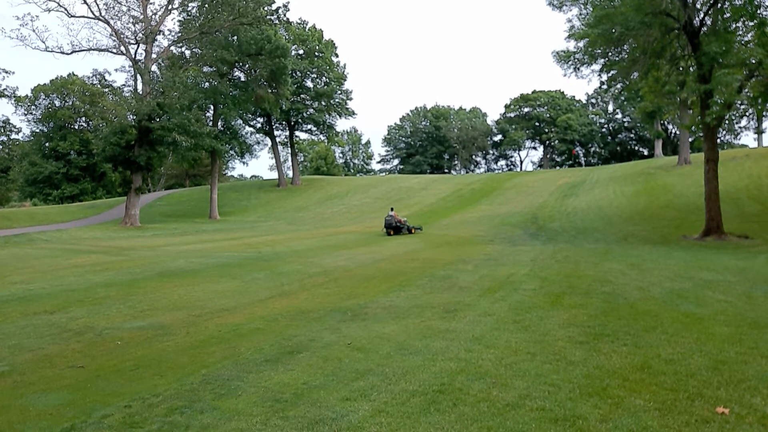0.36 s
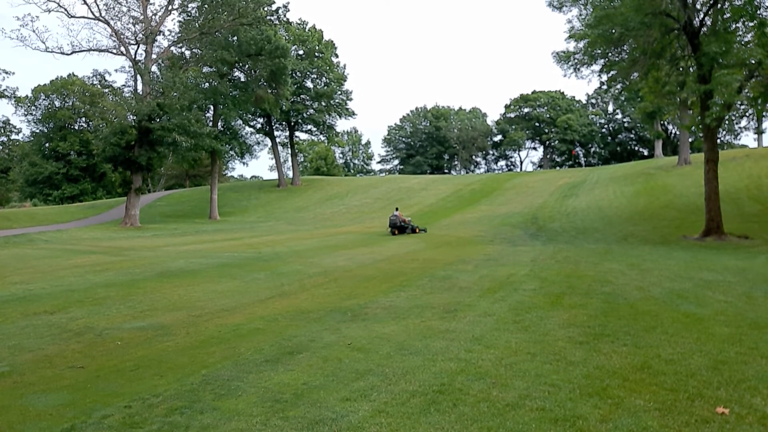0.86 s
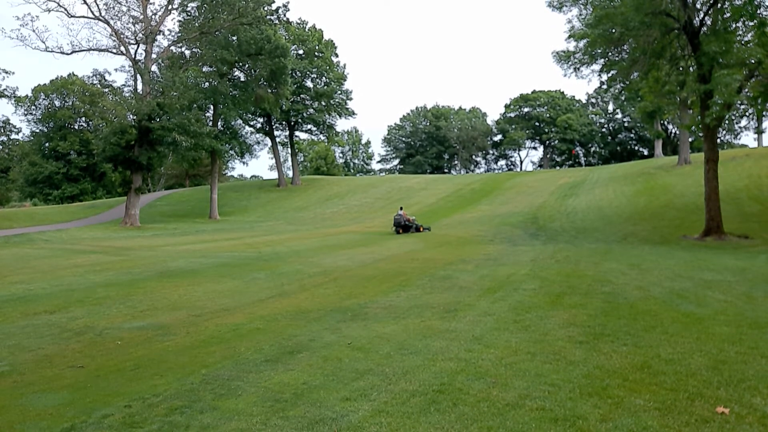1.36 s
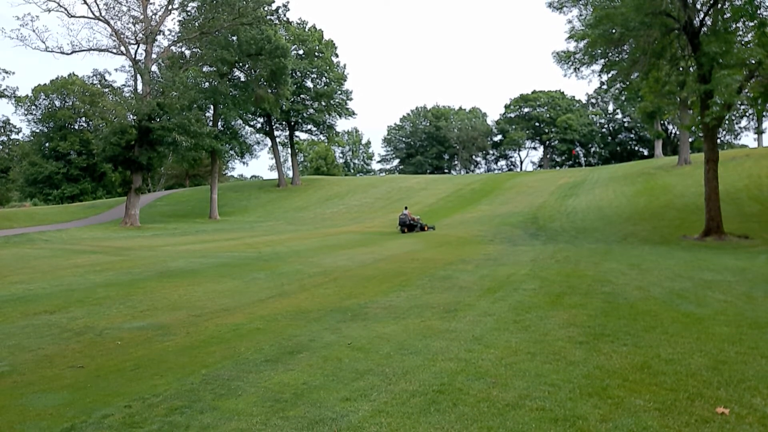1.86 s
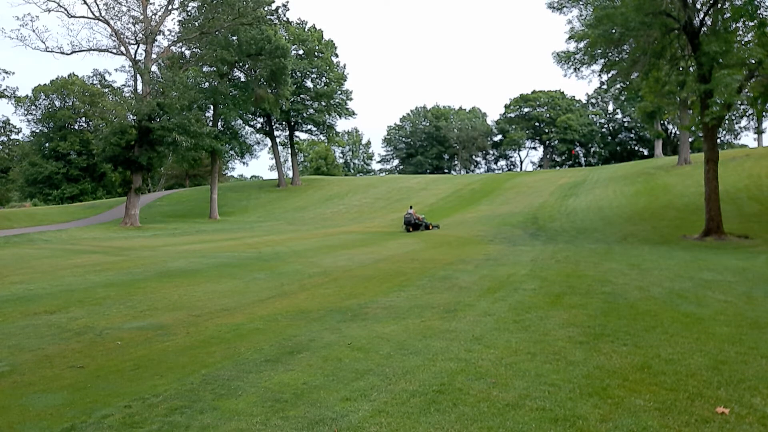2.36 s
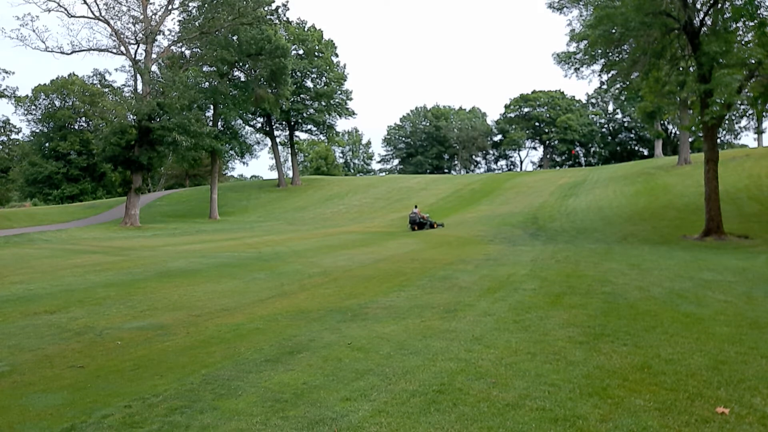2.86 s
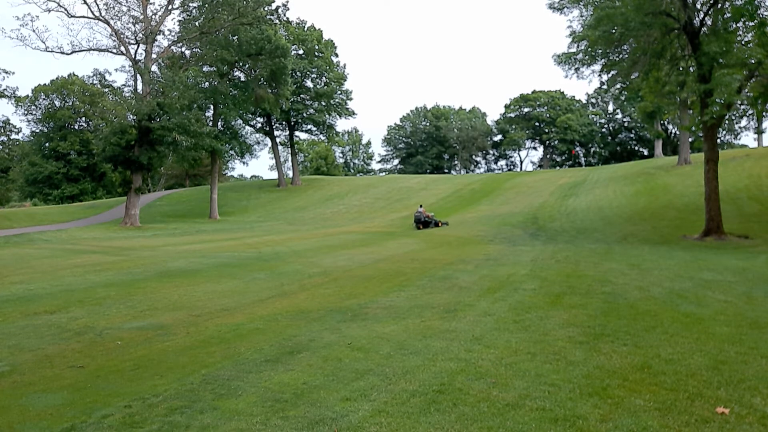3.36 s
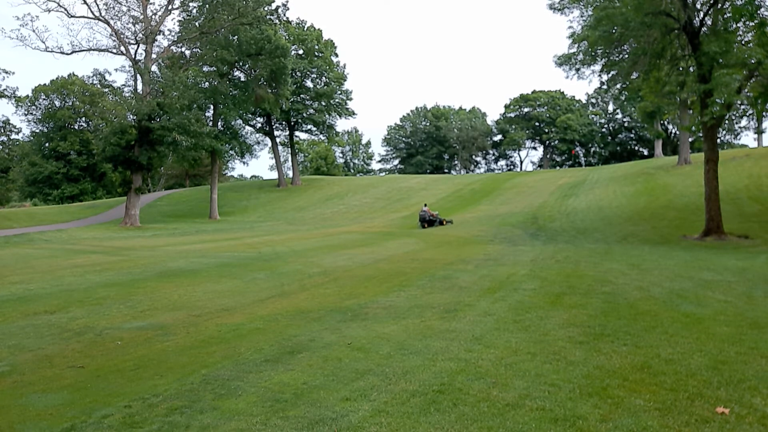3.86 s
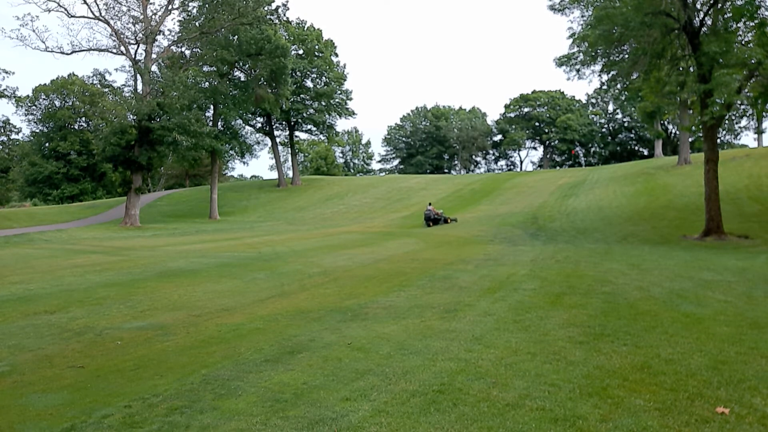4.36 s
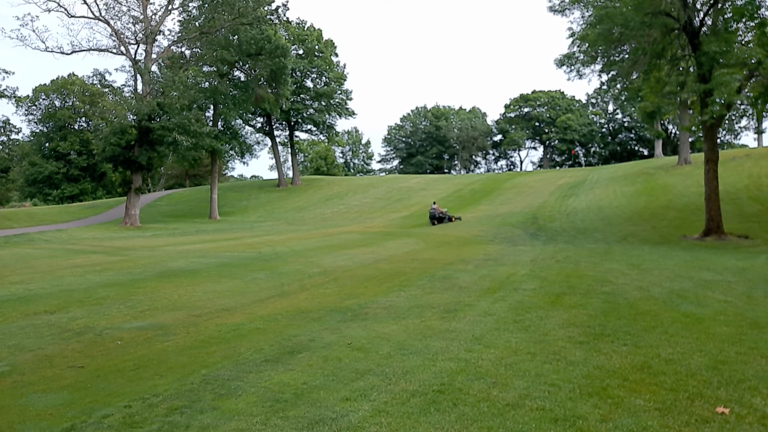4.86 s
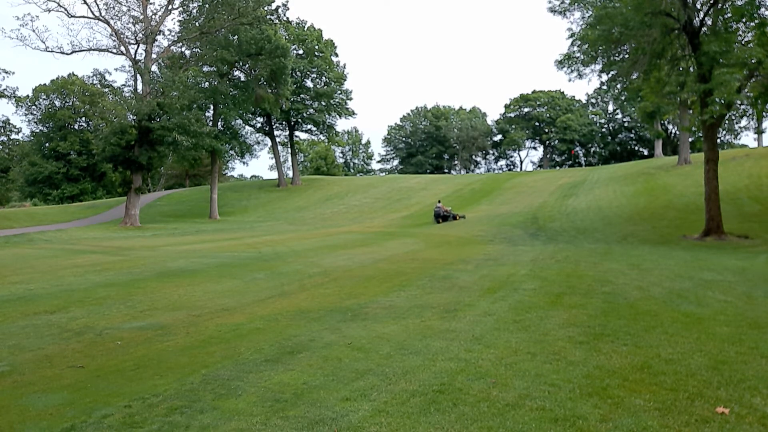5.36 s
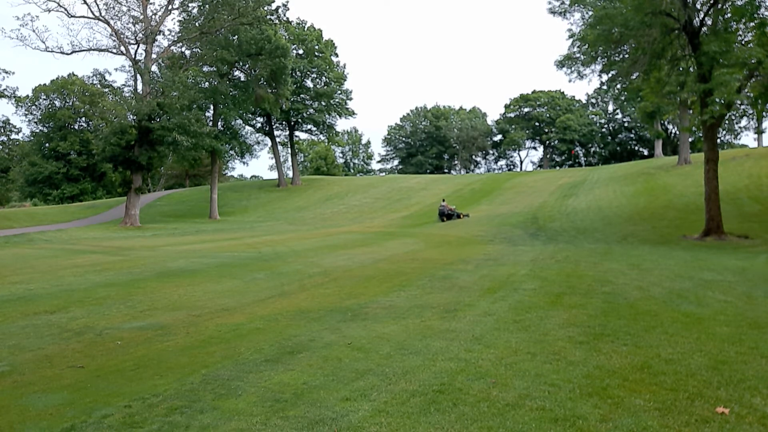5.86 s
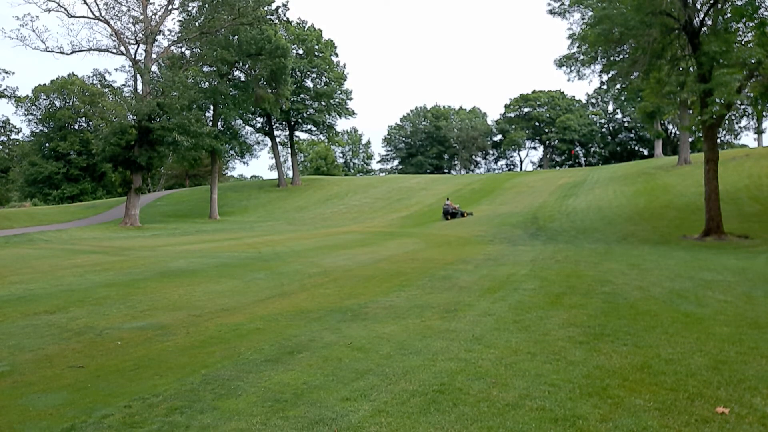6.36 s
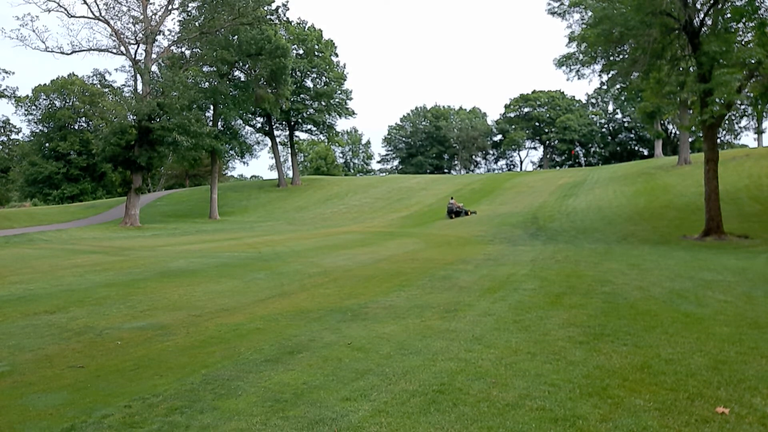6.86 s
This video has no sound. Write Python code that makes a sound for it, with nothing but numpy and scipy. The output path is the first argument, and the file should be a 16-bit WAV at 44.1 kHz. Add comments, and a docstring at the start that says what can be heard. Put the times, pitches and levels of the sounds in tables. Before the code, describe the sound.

From 0 s a distant riding mower is already running: a deep, tight buzz of about 80 firings a second with a strong octave, soft exhaust rumble and a mid-range fan drone. At about 0.5 s the pitch starts sliding down, reaching roughly 70 at 0.9 s, the motor turning rougher as it labours. A sharp spurt of grass hiss at 0.9 s and several more to 1.1 s mark the cutters biting. By 1.4 s the engine has recovered to about 77 and the fan drone is weaker. Steady cutter hiss, fluttering about fifteen times a second, is fullest near 1.7 s, with small spits until 2.4 s and sparser ones to 5.4 s. Pitch eases very gradually to 75. Belt tone and deck roar fade slightly while thin pump whine grows, clearest near 6 s. Open outdoor stereo, nearly centred, faint breeze; it ends at 7 s still running.

```python
"""Across a wide lawn, a three-cylinder riding mower drives far from a pair of microphone ports.
The engine is a train of firing pulses that sags once as the cutters take load, then settles; belt, fan and
pump tones turn in fixed ratios to it. Noise bands make the exhaust rumble, the deck's roar and the cutters'
hiss, with bursts for spat grass. Short echoes, scattered noise and a light breeze surround the two ports."""
import sys
import numpy as np
from scipy import signal
from scipy.fft import rfft, irfft, next_fast_len
from scipy.io import wavfile
from scipy.ndimage import map_coordinates

SR = 44100
rng = np.random.default_rng(int(sys.argv[2]) if len(sys.argv) > 2 else 0)


def amplitude_ratio(level_db):
    """Convert a level in decibels to the matching linear amplitude (field) ratio."""
    exponent = np.asarray(level_db, float) / 20
    return 10 ** exponent


def master(y):
    """Save y as 16-bit WAV."""
    cut = np.clip(np.atleast_2d(y).T, -1, 1)
    pcm = np.round(cut * 32767)  # scale
    wavfile.write(sys.argv[1], SR, pcm.astype(np.int16))


N = 308695  # samples, 7 s


def unit(x):
    """Normalisation: scales a signal to rms 1."""
    return x / np.sqrt(np.mean(x ** 2) + 1e-20)


def along(points, hz):
    """Logarithmic pitch scale: interpolates (hz, value) points along log frequency."""
    point_hz, value = np.transpose(points)
    return np.interp(np.log(hz + 1), np.log(point_hz + 1), value)


def curves(rows):
    """Linear interpolation: one value per sample for each column after the time."""
    time_s, *columns = np.transpose(rows)
    return [np.interp(np.arange(N) / SR, time_s, column) for column in columns]


def wobble(rate):
    """Slow random modulation: a smooth curve through random knots, rate of them a second."""
    knots = rng.standard_normal(int(N * rate / SR) + 4)
    return map_coordinates(knots, [np.arange(N) * rate / SR])


def filtered(x, response):
    """Linear filtering: multiplies the spectrum by a complex response of frequency."""
    size = next_fast_len(N + 8192)
    return irfft(rfft(x, size) * response(np.fft.rfftfreq(size, 1 / SR)), size)[..., :N]


def rush(spectrum, shape=1):
    """Turbulence as coloured noise: white noise shaped in time, then in frequency, at rms 1."""
    below, above = (spectrum[0][0] * 0.8, -120), (spectrum[-1][0] * 1.2, -120)  # closes the band
    closed = [below, *spectrum, above]
    return unit(filtered(shape * rng.standard_normal(N), lambda hz: amplitude_ratio(along(closed, hz))))


def tone(turn, db):
    """Simple harmonic motion: a sine of the given phase and rms level, started at random."""
    return np.sqrt(2) * amplitude_ratio(db) * np.cos(turn + rng.uniform(0, 2 * np.pi))


# The engine's pace: time_s, firing_rate_hz
SPEED = [(0, 80.25), (0.45, 80.1), (0.55, 77.99), (0.65, 75.08), (0.75, 74.37), (0.92, 69.68), (1, 70.95),
         (1.2, 75.94), (1.45, 77.05), (1.7, 77.52), (2.8, 76.72), (3.8, 75.75), (4.4, 75.7), (4.8, 75.25),
         (5.2, 75.25), (5.6, 74.6), (6, 74.9), (7, 74.74)]


def firing_cycle():
    """Phase is the integral of frequency: the firing rate in Hz and its running phase in radians."""
    rate, = curves(SPEED)
    return rate, 2 * np.pi * np.cumsum(rate) / SR


# Strongest exhaust tones, rms levels at 1, 2 and 4 times the firing rate:
# time_s, firing_db, octave_db, fourth_db
EXHAUST = [(0, -25.5, -30, -45.5), (.45, -24, -32.5, -41.5), (.7, -27, -33.5, -45.5), (1, -26, -33, -48),
           (1.4, -26, -33.5, -43), (2, -26, -32.5, -41), (2.6, -26, -30, -41), (3.3, -25, -33.5, -44),
           (4, -25.5, -32, -40.5), (4.6, -25, -30, -45.5), (5.7, -27, -33, -43), (6.3, -25.5, -33.5, -41),
           (7, -25, -33.5, -45.5)]
# Further tones locked to the engine, as multiples of the firing rate; the thirds come from unequal cylinders,
# and 6 is the pump's lowest whine: ratio
MULTIPLES = [2 / 3, 4 / 3, 3 / 2, 5 / 3, 7 / 3, 5 / 2, 8 / 3, 3, 16 / 3, 6, 40 / 3, 16]
# Rms level of each of those overtones: level_db
OVERTONES_DB = [-51, -44.5, -50.5, -46.5, -55, -67, -61.5, -54, -61.5, -54.5, -61.5, -65.5]


def exhaust(rate, firing):
    """Harmonic series: overtones line up into sharp pulses; the pipe's boom at the firing rate runs ahead."""
    first_db, second_db, fourth_db = curves(EXHAUST)
    sag = np.clip(75 - rate, 0, 4)  # Hz; firings turn uneven while the engine labours
    turn = firing + (0.024 + 0.049 * sag) * wobble(25)
    effort_db = 0.39 * wobble(9.1)
    lead = 1.3  # radians of the firing cycle
    pulse = amplitude_ratio(first_db + effort_db) * np.cos(turn + lead)
    pulse += amplitude_ratio(second_db + 1.07 * effort_db + 0.32 * wobble(15)) * np.cos(2 * turn)
    pulse += amplitude_ratio(fourth_db + 0.93 * wobble(5)) * np.cos(4 * turn)
    for ratio, level_db in zip(MULTIPLES, OVERTONES_DB):
        pulse += amplitude_ratio(level_db + 0.65 * wobble(7)) * np.cos(ratio * turn)
    return np.sqrt(2) * pulse


def belt(firing):
    """Geared rotation: a tone and its octave at a fixed ratio, fading as the mower moves on."""
    turn = 4.38 * firing + 0.3 * wobble(12)
    level_db = -44 - 0.61 * np.arange(N) / SR + 1.2 * wobble(1.32)
    fundamental = tone(turn, level_db + 0.9 * wobble(6.5))
    octave = tone(2 * turn, level_db - 14 + 0.54 * wobble(4.6))
    return fundamental + octave


def fan(rate, firing):
    """Resonance: the cooling fan's drone leaves the deck's resonance as the engine slows."""
    ratio = 20 / 3  # ten times the crank speed
    resonance_hz, width_hz = 528.3, 12
    drone = tone(ratio * firing + 0.5 * wobble(11), -40 + 1.2 * wobble(11.0))  # level on the resonance
    return drone / (1 + ((ratio * rate - resonance_hz) / width_hz) ** 2)


# Pump overtones at 12, 18, 24, 30 times the firing rate, levels ahead of the housing's resonance:
# early_db, late_db, swell_s, swell_width_s
PUMP = [(-57.5, -49.5, 5.8, 0.32), (-65.5, -58.5, 3.5, 4.2), (-79, -76.5, 4.2, .3), (-70, -58, 3, 1.8)]


def pump(firing):
    """Gear meshing: nine teeth pass per crank turn; overtones swell in turn and flicker through the air."""
    teeth, t = 6 * firing, np.arange(N) / SR
    whine = 0
    for k, (early_db, late_db, swell_s, width_s) in zip(range(2, 6), PUMP):
        swell = (1 + np.tanh((t - swell_s) / width_s)) / 2
        level_db = early_db + (late_db - early_db) * swell + 1.4 * wobble(6.9)
        whine = whine + tone(k * (teeth + 0.15 * wobble(20)), level_db)

    def housing(hz):
        """Damped resonance: the housing rings when an overtone passes."""
        ring_hz, width_hz = 1788, 36
        damping = 1j * hz * width_hz
        return 1 + amplitude_ratio(20) * damping / (ring_hz ** 2 - hz ** 2 + damping)

    return filtered(whine, housing)


# Colour of the exhaust turbulence: frequency_hz, relative_density_db (per Hz)
RUMBLE = [(25, -51), (46, -13), (80, -6.5), (120, -6), (160, -13.5), (205, -17.5), (250, -18.5), (310, -9),
          (420, -27)]


def puffs(firing):
    """Amplitude modulation: exhaust turbulence pulses once a firing."""
    return amplitude_ratio(-39) * rush(RUMBLE, 1 + 0.12 * np.cos(firing))


# Colour of the deck's roar: frequency_hz, relative_density_db (per Hz)
DECK = [(380, -1.5), (425, -6), (525, 6), (685, -8), (760, -11.5), (900, -34)]


def deck(firing):
    """Amplitude modulation: the deck's roar pulses with the firings and fades as the mower moves on."""
    level_db = -44 - 0.5 * np.arange(N) / SR
    pulsing = 1 + 0.093 * np.cos(firing)
    return amplitude_ratio(level_db) * rush(DECK, amplitude_ratio(0.25 * wobble(12)) * pulsing)


# Loudest bursts of cut grass: start_s, hiss_db, fizz_db
SPITS = [(0.888, -37, -48), (0.936, -47, -44), (1.017, -44.5, -49), (1.0907, -39.5, -51.5),
         (1.611, -43, -55.5), (1.9919, -43, -57), (2.168, -42.5, -45), (2.3476, -43.5, -55),
         (3.043, -51, -53.5), (3.241, -53, -61), (4.079, -44, -52), (4.6324, -46, -55), (5.2779, -45, -53),
         (5.3547, -44, -55)]


def spits():
    """Impulse excitation: burst envelopes for the listed spits in two bands and for an uneven flail."""
    start_s, hiss_db, fizz_db = np.transpose(SPITS)
    t = np.arange(SR // 10) / SR
    swell = t / 0.0051 * np.exp(1 - t / 0.0042)
    tail = 0.2 * (1 - np.exp(-t / 0.005)) * amplitude_ratio(-60 * t / 0.36)
    kicks = np.zeros((3, N))
    start = (start_s * SR).astype(int)
    kicks[0, start] = amplitude_ratio(hiss_db)
    kicks[1, start] = amplitude_ratio(fizz_db)
    beat = np.cumsum(15.5 * (1 + 0.0856 * wobble(5))) / SR  # about fifteen flails a second
    kicks[2, np.flatnonzero(np.diff(np.floor(beat)))] = 1
    kicks[2] *= amplitude_ratio(4.4 * wobble(20))
    return signal.fftconvolve(kicks, (swell + tail)[None], axes=1)[:, :N]


# Steady cutter noise: time_s, hiss_db, fizz_db
CUTTING = [(0, -55, -61), (.8, -51, -60.5), (1, -48.5, -57), (1.7, -46, -55), (2.8, -47.5, -58),
           (4.4, -49, -60.5), (5.2, -48.5, -57.5), (7, -50, -59)]
# Colour of the body roar: frequency_hz, relative_density_db (per Hz)
BODY = [(700, -11), (850, -1), (1100, -4), (1800, -2), (2800, -1.5), (3600, -6), (4500, -8)]
# Colour of the cutter hiss: frequency_hz, relative_density_db (per Hz)
HISS = [(2500, -5), (3300, -2), (4500, -1), (6000, -2), (7500, -5.5), (9000, -12.5), (11000, -36)]
# Colour of the treble fizz: frequency_hz, relative_density_db (per Hz)
FIZZ = [(7000, -13), (8500, -3.5), (10500, -7), (12200, -6), (13500, -14.5), (15700, -19), (16500, -33)]


def cutters(firing):
    """Modulated turbulence: body roar pulses with the engine while the cutters hiss, flail and spit."""
    hiss_db, fizz_db = curves(CUTTING)
    low, high, flail = spits()
    load_db = hiss_db - hiss_db.max()
    flail = flail * amplitude_ratio(0.7 * load_db)
    body_db = -47.5 + 0.21 * np.arange(N) / SR + 0.15 * load_db  # grows as the mower moves on
    pulsing = 1 + 0.077 * np.cos(2 * firing) + 0.036 * np.cos(firing)
    body = amplitude_ratio(body_db) * rush(BODY, amplitude_ratio(0.22 * wobble(7.4)) * pulsing + 0.035 * flail)
    throb = 1 + 0.049 * np.cos(firing / 3)  # once per engine cycle
    hiss = amplitude_ratio(hiss_db) * rush(HISS, amplitude_ratio(0.2 * wobble(8.7)) * throb + 0.7 * flail)
    fizz = amplitude_ratio(fizz_db) * rush(FIZZ, amplitude_ratio(1.8 * wobble(7.1)) * throb + 1.46 * flail)
    spat = low * rush(HISS) + high * rush(FIZZ) + 0.88 * low * rush(BODY)
    return body + hiss + fizz + spat


# Scattered noise over direct noise: frequency_hz, level_db
DIFFUSE = [(100, 4.5), (300, -9.5), (700, -0.5), (1100, 4.5), (2500, 0), (5000, -3), (9000, -1.5),
           (12500, -0.5), (15000, -7)]


def ports(steady, noisy):
    """Interaural delay and diffusion: direct sound is late on the left; trees and ground scatter the noise."""
    hz, t, z = signal.stft(steady + noisy, SR, nperseg=512)
    lag_s = (21 + 6.5 * t) / 10 ** 6  # widens as the mower moves right
    apart = lag_s * np.array([1, -1])[:, None, None]  # half the lag on each side
    direct = z * np.exp(-1j * np.pi * hz[:, None] * apart)
    pair = signal.istft(direct, SR, nperseg=512)[1][:, :N]
    hz, t, z = signal.stft(noisy, SR, nperseg=2048)
    random_phase = np.exp(2j * np.pi * rng.random((2, *z.shape)))  # differs on each side
    scattered = signal.istft(z * random_phase, SR, nperseg=2048)[1][:, :N]
    return pair, filtered(scattered, lambda hz: amplitude_ratio(along(DIFFUSE, hz)))


# Surfaces beside the ports, gains relative to each other: left_ms, left_gain, right_ms, right_gain
ECHOES = [(1.674, 0.17, 1.563, 0.17), (1.714, 0.12, 1.615, 0.13), (1.841, -0.16, 1.77, 0.12),
          (1.894, -0.17, 1.852, -0.19), (2.016, -0.15, 1.904, -0.16), (2.179, -0.08, 2.069, -0.1),
          (2.357, -0.09, 2.151, 0.17), (2.708, 0.07, 2.693, 0.11)]


def nearby(hz):
    """Comb filtering: short echoes off surfaces beside each port, weak in the bass and the top treble."""
    columns = np.transpose(ECHOES)
    ms, gain = columns[0::2], columns[1::2]
    taps = np.sum(gain[..., None] * np.exp(-2j * np.pi * ms[..., None] / 1000 * hz), axis=1)
    shelf = (1 + 1j * hz / 2600) / (1 + 1j * hz / 1200)  # low mids reflect best, a little late
    treble_loss = 1 + 1j * hz / 12000
    bass_loss = hz ** 4 / (hz ** 4 + 700 ** 4)
    return 1 + 2.28 * taps * shelf / treble_loss * bass_loss


# Colour of air moving over the ports: frequency_hz, relative_density_db (per Hz)
BREEZE = [(25, -21), (40, 5), (90, 8), (200, -3)]


def breeze():
    """Flow noise: air moving over each port makes its own low, unsteady rush."""
    return amplitude_ratio(-58) * np.array([rush(BREEZE, amplitude_ratio(0.96 * wobble(9.9))) for side in range(2)])


def scene():
    """Superposition: the mower, heard directly and scattered, and a light breeze on each port."""
    rate, firing = firing_cycle()
    steady = exhaust(rate, firing) + belt(firing) + fan(rate, firing) + pump(firing)
    noisy = puffs(firing) + deck(firing) + cutters(firing)
    direct, scattered = ports(steady, noisy)
    return filtered(direct, nearby) + scattered + breeze()


def roll_off(x):
    """The treble ends steeply here."""
    return signal.sosfilt(signal.butter(12, 15640, fs=SR, output="sos"), x)


# Difference in colour between the ports: frequency_hz, left_over_right_db
TILT = [(60, -1), (180, -0.2), (350, 1.2), (700, 1.5), (1400, 2), (2800, 1.6), (5600, -1), (10000, 1.5),
        (14000, -5.5)]


def record(dry):
    """Cavity resonance: the ports differ in colour, and in phase near 9 kHz; microphone noise is added."""
    side = np.array([[1], [-1]]) / 2

    def port(hz):
        """Transfer function: half the difference in level and phase falls on each side."""
        trail = 1.4 * np.exp(-((hz - 9000) / 800) ** 2)  # radians the left port trails
        return amplitude_ratio(along(TILT, hz) * side) * np.exp(-1j * trail * side)

    ported = filtered(dry, port)
    own_noise = [rush([(5000, -10), (10000, 1), (16000, 1)]) for channel in range(2)]
    mix = ported + amplitude_ratio(-66.5) * np.array(own_noise)
    return roll_off(mix)


dry = scene()
out = record(dry)
master(out)
```